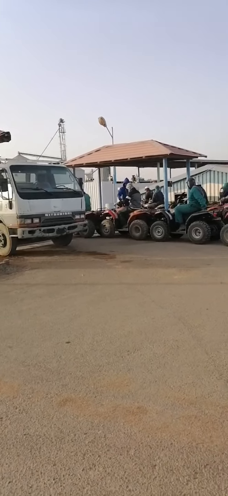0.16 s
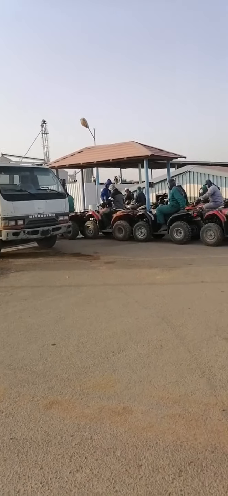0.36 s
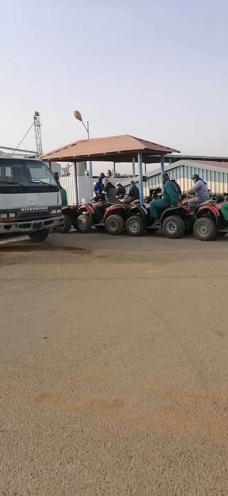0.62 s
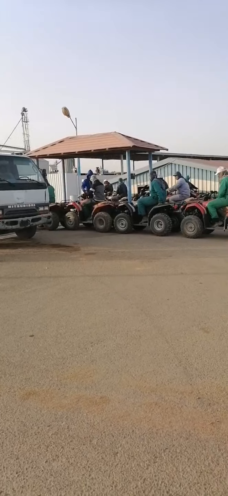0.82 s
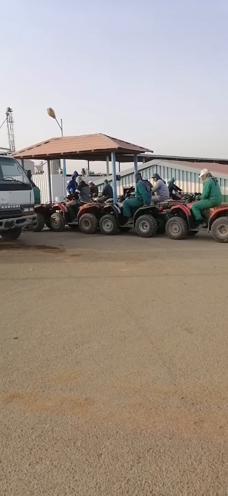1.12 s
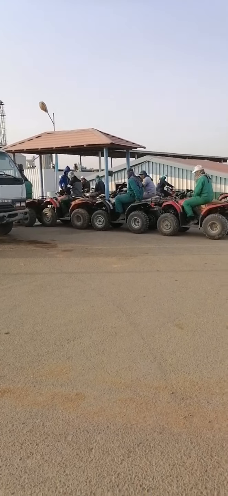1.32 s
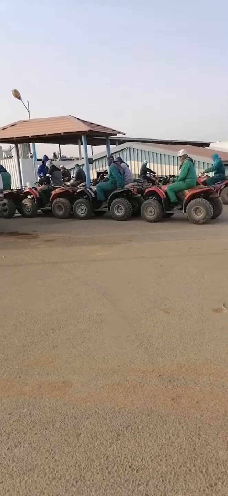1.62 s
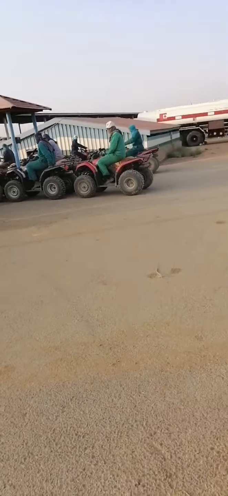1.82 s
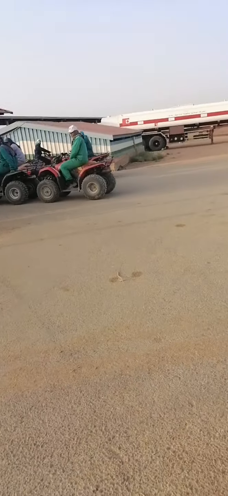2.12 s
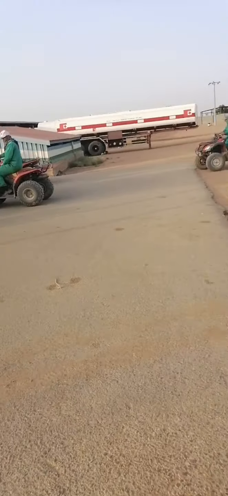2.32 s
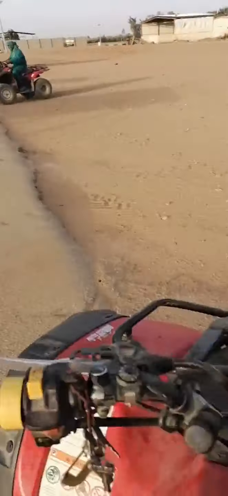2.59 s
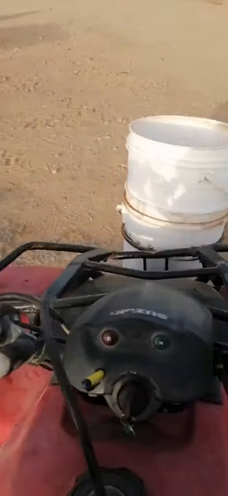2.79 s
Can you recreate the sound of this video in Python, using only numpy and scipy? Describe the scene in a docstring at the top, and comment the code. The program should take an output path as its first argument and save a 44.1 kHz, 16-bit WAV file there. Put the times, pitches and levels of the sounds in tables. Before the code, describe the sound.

Outdoors, a quad bike engine putters close by, its exhaust to the left, over the low drone of distant idling quads. It nearly stalls into slow chugs, then revs back up, and a loose panel starts to buzz and slap.

```python
"""An open farm yard in stereo: a single-cylinder quad bike close to the microphone, exhaust to the left,
more quads idling across the yard. Each cycle rings pipe and silencer box, then a tappet ticks; chain and
covers rattle in step. After a second the engine sags to separate chugs; faint squeaks and two brief
scuffs pass. Near 1.8 s it is throttled up again with hollow knocks and high metallic chinks, and at
the end a loose panel buzzes and slaps its mount."""
import sys
import numpy as np
from scipy import signal
from scipy.fft import rfft, irfft
from scipy.io import wavfile
from scipy.ndimage import uniform_filter1d

SR = 44100
rng = np.random.default_rng(int(sys.argv[2]) if len(sys.argv) > 2 else 0)


def inscribe(sig):
    """Save sig as 16-bit PCM at rate SR to the path in sys.argv[1].

    A 1-D sig is mono; a 2-D sig holds one channel per row.
    Samples are clipped to [-1, 1] before scaling.
    """
    pcm = np.round(np.clip(np.atleast_2d(sig).T, -1, 1) * 32767)
    wavfile.write(sys.argv[1], SR, pcm.astype(np.int16))


N = 130095
TIME = np.arange(N) / SR
RING_SPREAD = .016  # pitch scatter between strokes, as a share of the pitch


def from_db(db):
    """Decibels to gain."""
    return 10 ** (np.asarray(db) / 20)


def rms_one(x):
    """Scale to rms 1."""
    return x / np.sqrt(np.mean(x ** 2) + 1e-20)


def in_time(rows):
    """Each column of a curve at every sample."""
    s, *columns = np.transpose(rows)
    return [np.interp(TIME, s, c) for c in columns]


def at_hz(points, hz):
    """Read a spectrum on a log-frequency axis."""
    f, value = np.transpose(points)
    return np.interp(np.log(hz + 1), np.log(f), value)


def pan(db):
    """Left and right gains with mean 1; positive dB is to the left of the microphone."""
    gains = from_db(np.array([[db], [-db]]) / 2)
    return gains / gains.mean()


def noise(colour):
    """Coloured stereo noise, alike in the bass and unrelated in the treble; its middle has rms 1."""
    # Likeness of left and right. Each row: frequency in Hz, correlation.
    likeness = [(60, 0.64), (290, 1), (640, 0.31), (1400, -0.22), (3000, 0), (15000, -0.027)]
    hz = np.arange(N // 2 + 1) * SR / N
    mid, side = rfft(rng.standard_normal((2, N)))
    alike = np.clip(at_hz(likeness, hz), -1, 1)
    white = np.sqrt(1 + alike) * mid + np.sqrt(1 - alike) * side * [[1], [-1]]
    x = irfft(from_db(at_hz(colour, hz)) * white, N)
    return x / x.mean(0).std()


def flutter(rate_hz, depth_db):
    """A random gain with power 1."""
    r = np.exp(-2 * np.pi * rate_hz / SR)
    slow = signal.lfilter([1], [1, -2 * r, r * r], rng.standard_normal(N + SR))[SR:]
    return rms_one(from_db(depth_db * rms_one(slow)))


def surges(starts, delay_s, width_s, bed_db, spread_db):
    """A swell once a cycle above a steady bed; power 1."""
    hits = np.zeros(N + SR)
    hits[((starts + delay_s) * SR).astype(int)] = from_db(rng.normal(0, spread_db, len(starts)))
    bell = np.exp(-.5 * (np.arange(-SR // 20, SR // 20 + 1) / SR / width_s) ** 2)
    return rms_one(from_db(bed_db) + signal.fftconvolve(hits, bell, "same")[:N])


def resonate(force, modes):
    """Rough stereo force through narrow resonances, each with its own level and direction."""
    out = 0
    for hz, width_hz, db, side_db in modes:
        r, w = np.exp(-np.pi * width_hz / SR), 2 * np.pi * hz / SR
        ringing = signal.lfilter([0, np.sin(w)], [1, -2 * r * np.cos(w), r * r], force)
        out = out + from_db(db) * pan(side_db) * rms_one(ringing)
    return out


def envelope(t, attack, release_at, t60):
    """A straight rise, a hold and an exponential decay; times in seconds."""
    return np.clip(t / attack, 0, 1) * np.exp(-np.log(1000) * np.maximum(t - max(attack, release_at), 0) / t60)


def burst(hz, attack, release_at, t60):
    """One mode builds up and dies."""
    t = np.arange(SR // 5) / SR
    return envelope(t, attack, release_at, t60) * np.sin(2 * np.pi * hz * t)


def add(out, s, wave):
    """Mix a wave in at time s."""
    i = int(np.clip(s * SR, 0, N))
    out[i:i + len(wave)] += wave[:N - i]


def firings():
    """Start and length of every engine cycle, in seconds."""
    # Engine speed. Each row: time in seconds, firings per second.
    speed_curve = [(0.0, 18.187), (0.14, 17.934), (0.26, 18.901), (0.55, 18.724), (0.7, 17.784),
                   (0.9, 15.025), (1.12, 12.36), (1.32, 10.076), (1.45, 10.068), (1.55, 8.981),
                   (1.66, 9.959), (1.79, 13.886), (1.9, 15.659), (2.1, 16.591), (2.38, 16.616),
                   (2.55, 17.253), (2.95, 17.651)]
    speed, = in_time(speed_curve)
    cycles = np.cumsum(speed) / SR
    starts = np.interp(np.arange(int(cycles[-1]) + 1), cycles, TIME)
    return starts, 1 / np.interp(starts, TIME, speed)


def distant_quads():
    """Quads idling across the yard reach the microphone as a low drone."""
    # Each row: time in seconds, level in dB.
    level = [(0, -32), (.8, -31), (1.15, -35), (1.65, -34.5), (2.0, -32), (2.95, -33)]
    # Each row: frequency in Hz, spectral level in dB.
    colour = [(20, -45), (35, 1), (60, 0), (90, 4.5), (140, -6.5), (230, -5), (450, -19), (1000, -33),
              (2500, -36.5), (4500, -51.5), (14000, -63)]
    drone_db, = in_time(level)
    return from_db(drone_db) * noise(colour) * flutter(rate_hz=20, depth_db=.9) * pan(db=3)


def gas_ring(starts, lengths, modes, level_db):
    """Each gas pulse builds the modes up, holds them while the valve is open and lets them die."""
    # The gas sets the ring pitch, and its pulses are soft off the throttle.
    # Each row: time in seconds, pitch ratio, extra attack in seconds.
    gas = [(0, 1.0, .001), (.25, 1.04, .003), (.72, 1.05, .003), (.85, .95, .004), (1.75, .98, .002),
           (1.85, .98, .0003), (2.95, 1.0, .0003)]
    tuning, softness = in_time(gas)
    out = np.zeros(N)
    for hz, db, delay, attack, hold_share, t60, spread_db in modes:
        for s, cycle in zip(starts, lengths):
            i = int(s * SR)
            size, detune = rng.standard_normal(2).clip(-1.5, 1.5)
            pitch = hz * tuning[i] * (1 + RING_SPREAD * detune)
            wave = burst(pitch, attack + softness[i], hold_share * cycle, t60)
            add(out, s + delay, from_db(level_db[i] + db + spread_db * size) * wave)
    return out


def exhaust(starts, lengths):
    """Pipe note, box boom and slow chugs, rounded by the silencer; running pulses add a turbulent puff."""
    # Strength of the gas pulses. Each row: time in seconds, box boom in dB, pipe note in dB.
    load = [(0, -22.5, -26), (0.3, -24, -24), (0.7, -24.5, -26), (0.84, -23.5, -26), (1.03, -25, -28.5),
            (1.77, -23.5, -27), (1.85, -23, -24), (1.92, -24, -27), (2.1, -21.5, -24.5), (2.35, -19.5, -23),
            (2.6, -21.5, -21.5), (2.95, -21.5, -21.3)]
    # Modes of box and pipe. Each row: frequency in Hz, gain in dB, delay and attack in seconds,
    # release point as a share of the cycle, t60 in seconds, spread between strokes in dB.
    box_modes = [(99, 5.3, .002, .007, .38, .115, .7), (164, -13, .001, .002, .4, .07, 2),
                 (66, -11, .001, .006, .3, .08, 3)]
    pipe_modes = [(279, 4, .0001, .0006, .33, .03, .7), (222, -9, .0001, .001, .3, .06, 2),
                  (340, -11, .00015, .0009, .16, .07, 2), (450, -13, .0001, .0006, .3, .05, 2)]
    stall_from_s, stall_to_s = 1.07, 1.73  # nearly stalling, the engine only chugs
    silencer_hz, right_lag_s = 580, .00038  # the exhaust is on the left
    box_db, pipe_db = in_time(load)
    running = (starts < stall_from_s) | (starts > stall_to_s)
    cycles = lengths[running]
    lead = .2 * (cycles - cycles.min())  # in a longer cycle the pulse comes earlier
    pulses = np.maximum(starts[running] - lead, 0)
    pipe = gas_ring(pulses, cycles, pipe_modes, pipe_db) * pan(db=10.5)
    box = gas_ring(pulses, cycles, box_modes, box_db) * pan(db=6.5)
    silencer = signal.butter(3, silencer_hz, fs=SR, output="sos")
    tones = signal.sosfilt(silencer, pipe - box + chugs() * pan(db=3.5))
    swell = surges(pulses, delay_s=.013, width_s=.011, bed_db=-9, spread_db=1.2)
    # Each row: frequency in Hz, spectral level in dB.
    puff_colour = [(40, -12), (115, -4), (170, -7.5), (260, 3), (400, -10), (600, -34.5), (1200, -37),
                   (3000, -79)]
    puff = from_db((pipe_db + box_db) / 2 - 12) * noise(puff_colour) * swell
    left, right = tones + puff * pan(db=7)
    return np.array([left, np.interp(TIME - right_lag_s, TIME, right)])


def machinery(starts, lengths):
    """Casing, covers, chain and tappet clatter, each at its own point in the cycle."""
    # Each row: time in seconds, then relative levels of casing, covers, chain and tappet in dB.
    levels = [(0, -44, -48, -47, -45), (.4, -47.5, -51, -50, -44.5), (.7, -46.5, -53, -48.5, -40.5),
              (.86, -46.5, -53.5, -54, -53), (1.12, -51, -54, -56.5, -56), (1.2, -53, -54.5, -57, -52),
              (1.3, -52, -54, -58, -59), (1.39, -47, -51, -54, -47), (1.48, -49, -53, -56, -55),
              (1.62, -54.5, -56, -59.5, -56), (1.85, -49.5, -52.5, -53.5, -52.5),
              (2.3, -48, -50, -55.5, -63), (2.6, -47.5, -52, -56, -56), (2.95, -46, -52, -57, -58)]
    # Each row: frequency in Hz, spectral level in dB.
    casing_colour = [(250, -3), (500, 1), (800, -1.5), (1300, -7.5), (2000, -12), (4000, -24), (12000, -33)]
    cover_colour = [(1000, -16.5), (1650, -0.5), (1950, 0.5), (2300, 3.5), (2650, 0), (3300, -4),
                    (4000, -10.5), (6000, -7), (15000, -46)]
    chain_colour = [(3000, -37), (4600, -18), (5200, 0.5), (5900, -0.5), (6300, -3.5), (7000, 5.5),
                    (7900, -2.5), (9000, -14), (10500, -16), (12500, -27), (16000, -27)]
    casing_db, cover_db, chain_db, tappet_db = in_time(levels)
    casing = from_db(casing_db + 1) * noise(casing_colour) * flutter(rate_hz=130, depth_db=1.96)
    casing *= surges(starts, delay_s=.0091, width_s=.0087, bed_db=18, spread_db=4)
    cover = from_db(cover_db - 2) * noise(cover_colour) * flutter(rate_hz=170, depth_db=2.5)
    cover *= surges(starts, delay_s=.014, width_s=.012, bed_db=-5.5, spread_db=0)
    chain = from_db(chain_db) * noise(chain_colour) * flutter(rate_hz=130, depth_db=2)
    chain *= surges(starts, delay_s=.016, width_s=.0094, bed_db=6.5, spread_db=2.5)
    clatter = casing * pan(db=2.5) + cover * pan(db=2) + chain * pan(db=7)
    return clatter + tappet(starts, lengths, tappet_db)


def tappet(starts, lengths, level_db):
    """Well to the left, a sharp contact each cycle rings the valve cover, never quite alike."""
    # Valve cover modes. Each row: frequency in Hz, relative level in dB, t60 in seconds.
    modes = [(5340, 4, 0.021), (5420, -7, .05), (6660, -6, 0.017), (7200, -6, .025)]
    lag_s, lag_share, spread_db = .0095, .085, 1.2
    t, out = np.arange(SR // 20) / SR, np.zeros((2, N + SR))
    for s in starts + lag_s + lag_share * lengths:
        i = int(s * SR)
        for hz, db, t60 in modes:
            size, detune = rng.standard_normal(2)
            phases = rng.standard_normal((2, 1))
            shape = np.minimum(t / .0007, 1) * np.exp(-np.log(1000) * t / t60)
            wave = np.sin(2 * np.pi * hz * (1 + .006 * detune) * t + phases)
            out[:, i:i + len(t)] += from_db(db + spread_db * size) * shape * wave
    return rms_one(out[:, :N]) * from_db(level_db - 5.5) * pan(db=15.5)


def ringing_metal(starts):
    """Fins and a loose panel are shaken once a cycle; the chain whines without a pulse."""
    # Resonances. Each row: frequency and width in Hz, gain in dB, left over right in dB.
    fin_modes = [(9780, 400, 2, 4), (13850, 250, -8, 31), (14700, 800, 2.5, 18)]
    panel_modes = [(1885, 50, -2.5, 3), (2180, 60, -3, -3), (2070, 60, -4.5, 5), (2390, 150, -11, 0),
                   (2880, 92, -14, -4), (3338, 60, -15, -5)]
    whine_modes = [(5110, 36, -0.5, -4), (5800, 40, -7, 10), (6840, 60, -4.5, 10)]
    # The panel grows louder as the revs rise. Each row: time in seconds, level in dB.
    fin_level = [(0, -58.5), (.15, -60), (.26, -84), (.8, -68), (1.1, -82), (1.75, -97), (2.0, -66.5),
                 (2.28, -60.5), (2.6, -77), (2.95, -66)]
    panel_level = [(0, -76), (1.8, -67), (2.3, -55), (2.65, -48), (2.8, -45.5), (2.95, -44.5)]
    whine_level = [(0, -71), (1.1, -72), (1.8, -65.5), (2.1, -58), (2.33, -53.5), (2.42, -61), (2.95, -59)]
    fin_force, panel_force, chain_force = rng.standard_normal((3, 2, N))
    fin_force *= surges(starts, delay_s=.018, width_s=.005, bed_db=-3, spread_db=3)
    fin_force *= flutter(rate_hz=35, depth_db=2.5)
    panel_force *= surges(starts, delay_s=.024, width_s=.005, bed_db=-2, spread_db=1.5)
    fins = from_db(in_time(fin_level)) * resonate(fin_force, fin_modes)
    panel = from_db(in_time(panel_level)) * resonate(panel_force, panel_modes)
    whine = from_db(in_time(whine_level)) * resonate(chain_force, whine_modes)
    return fins + panel + whine


def chugs():
    """Near the stall each stroke is a deep boom with a dull knock, followed by a gulp."""
    # Each row: start, boom rise and boom t60 in seconds, boom in Hz and dB, knock in Hz and dB,
    # gulp in dB.
    strokes = [(1.088, .02, .045, 92, -16, 290, -33, -45), (1.18, .014, .16, 92, -17, 245, -29, -27),
               (1.262, .014, .14, 95, -18, 232, -29, -50), (1.368, .012, .14, 92, -26, 272, -26.5, -25),
               (1.464, .016, .08, 88, -20, 238, -26, -30), (1.572, .015, .1, 90, -19, 285, -31, -25),
               (1.672, .014, .1, 92, -20, 280, -29, -24)]
    # Each row: pitch ratio, gain in dB.
    boom_partials = [(1, .5), (.68, -6), (1.72, -10)]
    knock_partials = [(1, .5), (1.25, -6), (1.9, -13)]
    gulp_delay_s = .034
    gulp = burst(hz=102, attack=.01, release_at=.018, t60=.09)
    out = np.zeros(N)
    for s, rise, t60, boom_hz, boom_db, knock_hz, knock_db, gulp_db in strokes:
        for ratio, db in boom_partials:
            add(out, s, from_db(boom_db + db) * burst(boom_hz * ratio, rise, 0, t60))
        for ratio, db in knock_partials:
            pitch = knock_hz * ratio * (1 + RING_SPREAD * rng.standard_normal())
            add(out, s, from_db(knock_db + db) * burst(pitch, attack=.007, release_at=.016, t60=.05))
        add(out, s + gulp_delay_s, from_db(gulp_db) * gulp)
    return out


def squeaks():
    """Faint, unsteady tones, most of them rising."""
    # Each row: start and length in seconds, first and last pitch in Hz, relative level in dB,
    # left over right in dB.
    glides = [(1.138, .05, 848, 827, -54, 0), (1.359, 0.017, 13600, 13750, -55.5, 17),
              (1.822, .06, 1215, 1250, -55, -8), (1.98, .009, 14800, 15300, -52, 18),
              (2.011, 0.092, 1060, 1140, -54, 7)]
    out = 0
    for s, length, start_hz, end_hz, db, side_db in glides:
        progress = np.clip((TIME - s) / length, 0, 1)
        waver_hz = 22 * rms_one(uniform_filter1d(rng.standard_normal(N), size=200))
        pitch = start_hz + (end_hz - start_hz) * progress + waver_hz
        tone = np.sin(2 * np.pi * np.cumsum(pitch) / SR)
        shape = 2 * np.sin(np.pi * progress) * flutter(rate_hz=150, depth_db=3.5)
        out = out + from_db(db) * shape * tone * pan(side_db)
    return out


def scuffs():
    """Two brief gritty rubs, left of centre."""
    # Each row: start, attack and t60 in seconds, level in dB.
    rubs = [(1.321, .007, .09, -42), (1.712, .011, .055, -36.5)]
    # Each row: frequency in Hz, spectral level in dB.
    colour = [(800, -16), (2200, 2), (3200, 1), (4200, -9), (5500, 4), (7200, 2), (9000, -18), (15000, -33)]
    level = sum(from_db(db) * envelope(TIME - s, attack, 0, t60) for s, attack, t60, db in rubs)
    return level * noise(colour) * flutter(rate_hz=270, depth_db=3) * pan(db=5)


def knocks():
    """Hollow knocks, most as the throttle opens: rough bursts, each in one broad resonance."""
    # Each row: start in seconds, centre and width in Hz, relative level in dB.
    hits = [(1.505, 1820, 250, -49), (1.886, 654, 130, -42), (1.95, 750, 200, -40), (2.013, 830, 400, -41)]
    out = 0
    for s, hz, width, db in hits:
        shape = envelope(TIME - s, attack=.006, release_at=0, t60=.085)
        band = signal.butter(2, [hz - width / 2, hz + width / 2], "band", fs=SR, output="sos")
        hollow = rms_one(signal.sosfilt(band, rng.standard_normal((2, N))))
        out = out + from_db(db + 7.5) * shape * hollow
    return out


def chinks():
    """Small loose metal parts touch, each time with a slightly different high ring."""
    # Each row: start in seconds, level in dB.
    touches = [(1.82, -50), (2.049, -52), (2.131, -49), (2.194, -46), (2.243, -50), (2.256, -50),
               (2.287, -50), (2.32, -51), (2.352, -52), (2.41, -52), (2.548, -56), (2.871, -46),
               (2.901, -55)]
    # Each row: frequency in Hz, gain in dB, t60 in seconds.
    modes = [(9720, 1.5, .028), (13850, -8, .035)]
    out = np.zeros(N)
    for s, db in touches:
        for hz, mode_db, t60 in modes:
            pitch = hz * (1 + .006 * rng.standard_normal())
            add(out, s, from_db(db + mode_db) * burst(pitch, attack=.002, release_at=.003, t60=t60))
    return out * pan(db=4)


def panel_slaps():
    """At high load the loose panel hits its mount in short, rough bursts."""
    # Each row: start in seconds, level in dB.
    slaps = [(2.704, -43), (2.804, -43), (2.819, -37.5), (2.862, -43), (2.876, -36), (2.931, -37.5)]
    # Each row: frequency in Hz, spectral level in dB.
    colour = [(1000, -28), (1750, -14), (1900, 5), (2200, 0), (2500, -13), (3300, -9), (4200, -21),
              (9000, -33), (15000, -50)]
    level = sum(from_db(db) * envelope(TIME - s, attack=.002, release_at=.004, t60=.045)
                for s, db in slaps)
    return level * noise(colour) * flutter(rate_hz=300, depth_db=2)


def scene():
    """The engine close to the microphone, over the drone from across the yard."""
    starts, lengths = firings()
    yard = distant_quads()
    engine = exhaust(starts, lengths) + machinery(starts, lengths) + ringing_metal(starts)
    rattles = knocks() + chinks() + panel_slaps()
    return engine + rattles + scuffs() + squeaks() + yard


def record(dry):
    """The top of the microphone signal is cut steeply."""
    cutoff_hz = 15700
    return signal.sosfilt(signal.ellip(10, .2, 80, cutoff_hz, fs=SR, output="sos"), dry)


dry = scene()
out = record(dry)
inscribe(out)
```